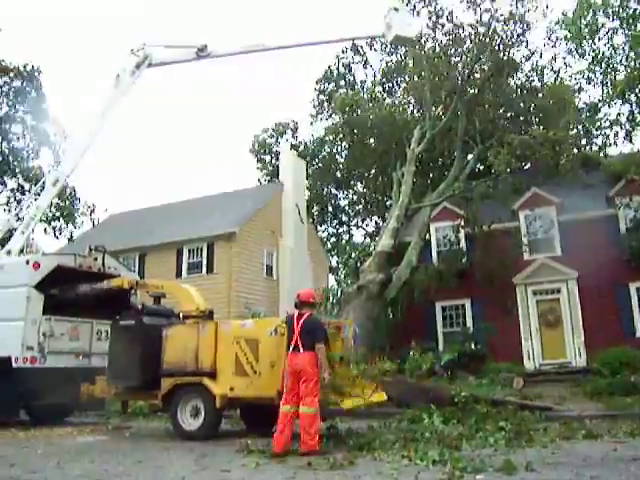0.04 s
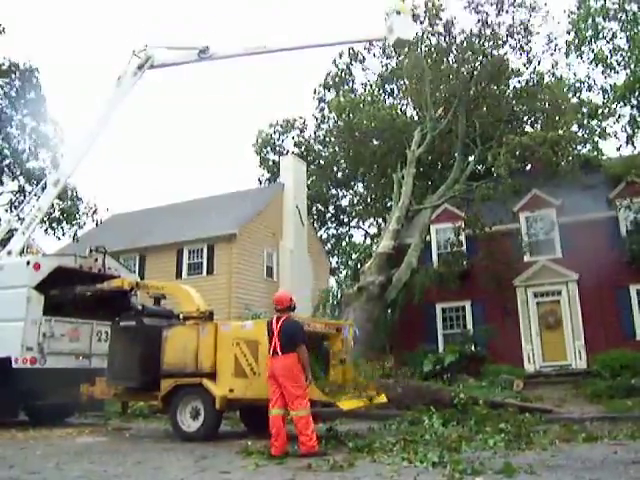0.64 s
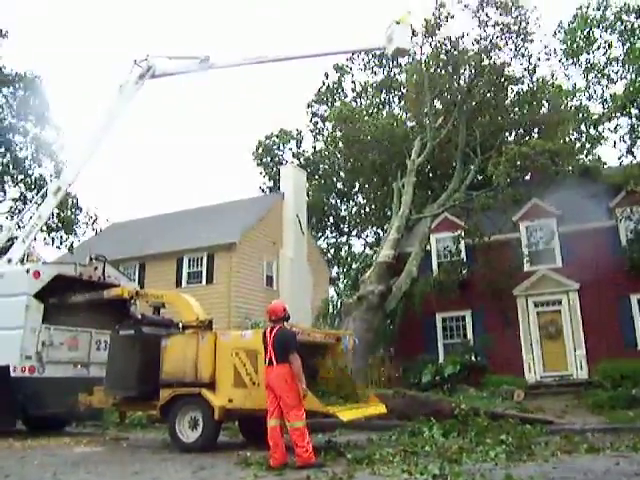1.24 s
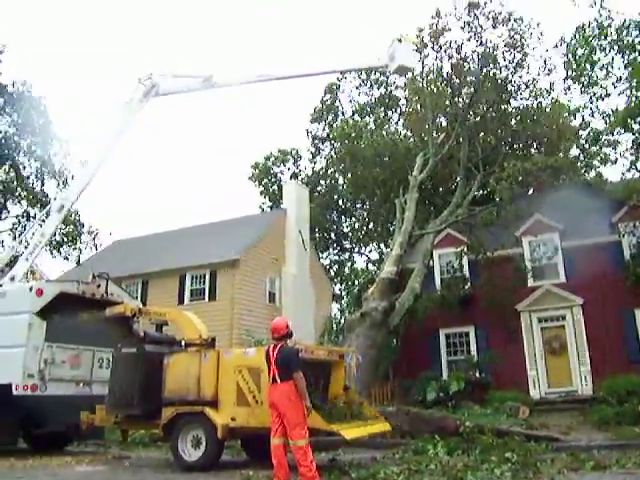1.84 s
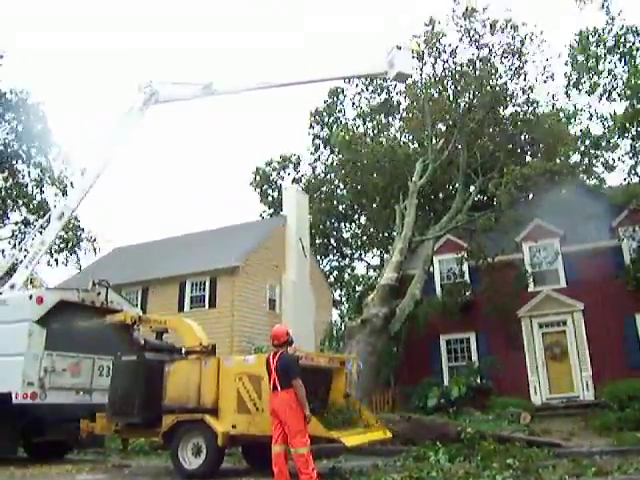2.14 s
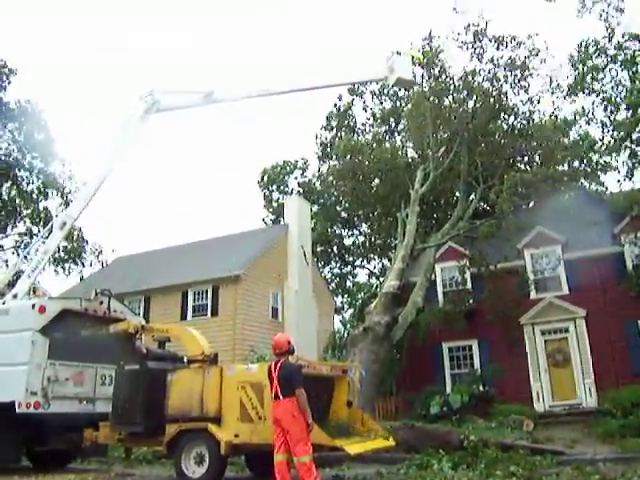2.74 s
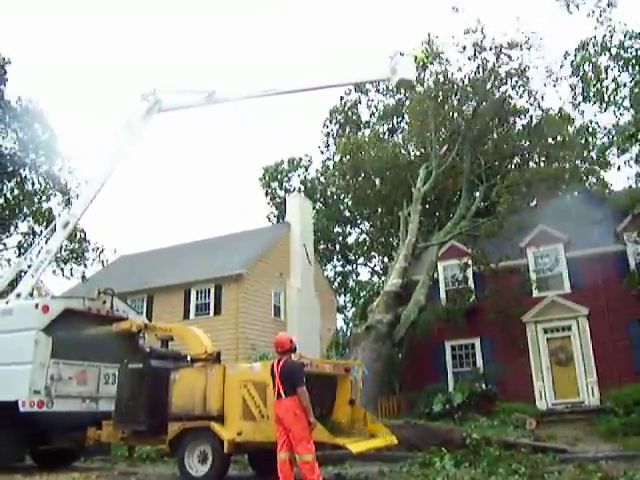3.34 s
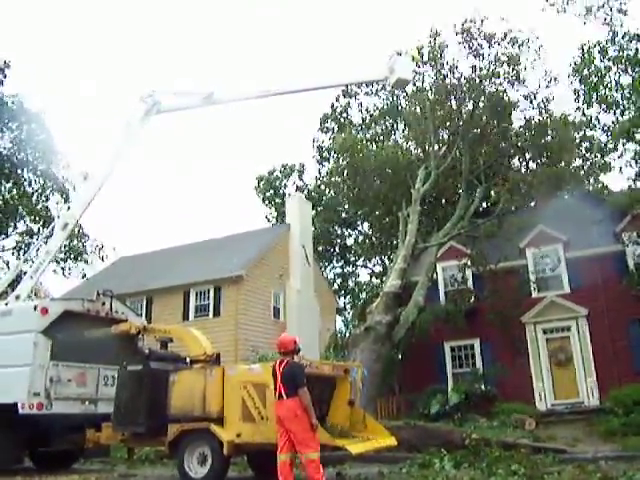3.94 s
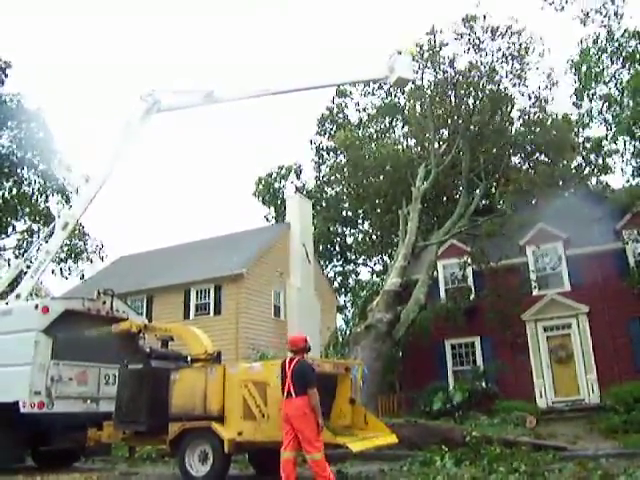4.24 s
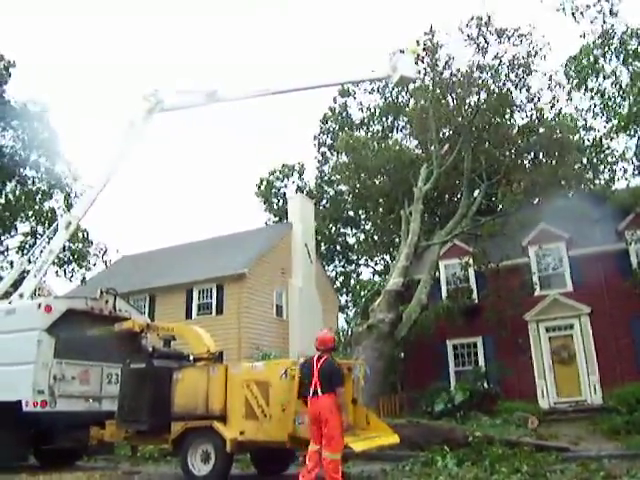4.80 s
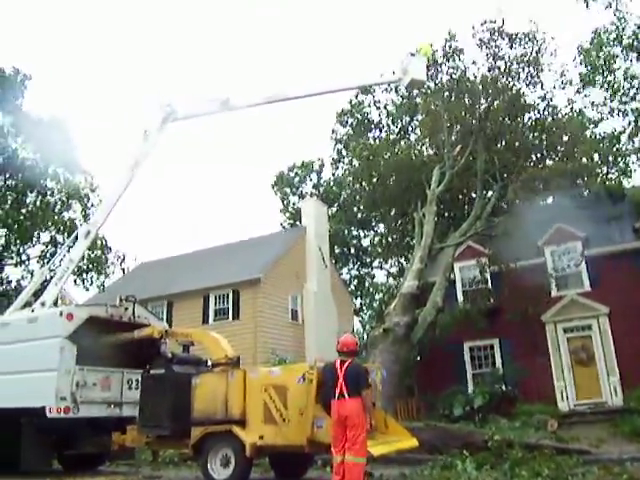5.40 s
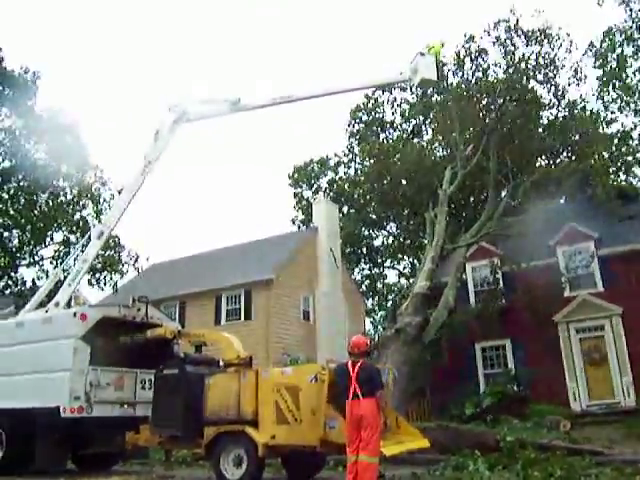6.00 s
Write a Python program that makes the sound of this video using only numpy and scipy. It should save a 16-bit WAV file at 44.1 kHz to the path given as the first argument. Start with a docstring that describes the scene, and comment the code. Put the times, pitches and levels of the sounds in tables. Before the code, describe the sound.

Branches rush and rattle through a wood chipper in repeated swells over its even, low engine drone, with a few faint knocks.

```python
"""A steady engine hum and a rush that swells with each branch: a wood chipper in a street, a truck behind.
At governed speed the exhaust beats evenly over a low rumble; the steel housing drones and rattles,
and air hisses from the chute. The housing howls in surges, and bits of wood clack faintly in it.
Now and then the whole sound dips suddenly and creeps back."""
import sys
import numpy as np
from scipy import signal
from scipy.fft import rfft, irfft, next_fast_len
from scipy.io import wavfile

SR = 44100
rng = np.random.default_rng(int(sys.argv[2]) if len(sys.argv) > 2 else 0)


def int16_out(signal):
    """Quantize to a 16-bit WAV file."""
    q = np.round(np.clip(np.atleast_2d(signal).T, -1, 1) * 32767)
    wavfile.write(sys.argv[1], SR, q.astype(np.int16))


N = 267246

TRUCK_CYCLE_HZ, FAN_BLADE_HZ = 21.24, 253.15
# truck engine harmonics: order, level_db
TRUCK_ORDERS = [(4, -36), (6, -41.5), (9, -35), (14, -44), (30, -50.5)]
# cooling fan harmonics: order, level_db
FAN_ORDERS = [(1, -28.5), (2, -46.5), (4, -45.5)]

# chipper crankshaft speed: time_s, speed_hz
CRANK_SPEED = [(0.3, 33.516), (0.8, 33.477), (1.3, 33.433), (1.8, 33.518), (2.3, 33.542), (2.8, 33.566),
               (3.3, 33.466), (3.8, 33.496), (4.3, 33.486), (4.8, 33.516), (5.3, 33.511), (5.8, 33.539)]
# slow, slight rise and fall in the exhaust's loudness: time_s, gain_db
EXHAUST_LEVEL = [(0, -0.4), (1.2, 0), (1.7, .3), (2.25, -0.9), (2.7, 0.8), (3.15, -0.2), (3.8, -0.7),
                 (4.4, 0.3), (5.1, -0.4), (6.06, -.4)]
# exhaust harmonics: crank_order, level_db
EXHAUST_ORDERS = [(1, -40.5), (2, -58), (3, -22.5), (4, -23), (5, -22), (6, -32), (7, -25), (8, -27.5),
                  (9, -39.5), (10, -55), (11, -42.5), (12, -45.5), (13, -46), (14, -52), (15, -48.5),
                  (16, -48.5), (17, -51), (19, -53.5), (20, -51.5), (22, -52)]
# exhaust gas spectrum: freq_hz, density_db
RUMBLE_SPECTRUM = [(4, -20.5), (15, -5.5), (58, -1.5), (95, 1), (150, 0), (195, 3.5), (255, -4.5),
                   (320, -8.5), (520, -13.5), (700, -23), (1500, -55.5)]

# housing drone spectrum: freq_hz, density_db
DRONE_SPECTRUM = [(300, -29), (570, -8), (660, -1.5), (780, -0.5), (900, -2.5), (970, -10.5), (1100, -12),
                  (1500, -22), (4000, -56)]
DRONE_IDLE_DB, PANEL_IDLE_DB = -31.5, -40
# housing howls: middle_s, length_s, drone_db, panel_db
HOWL_SURGES = [(.57, 0.23, -34, -37), (.87, 0.2, -29, -31.5), (2.14, 0.13, -31.5, -38),
               (3.23, 0.17, -30.5, -35), (3.497, 0.17, -25, -32), (3.86, 0.082, -34, -35),
               (4.46, .14, -34.5, -29), (5.442, 0.25, -29.5, -41)]
# modes of the struck housing: freq_hz, width_hz, level_db
HOUSING_MODES = [(784, 280, 0), (1350, 580, 6), (2220, 770, 12), (2700, 400, 6.5), (4700, 1800, 5),
                 (6730, 910, -2)]
# wood hitting the housing: start_s, level_db, t60_s, tilt_db_per_octave
WOOD_HITS = [(0.208, -18, 0.067, -5), (.298, -17, 0.092, -7), (.387, -12.5, 0.095, -8),
             (.833, -15, 0.13, -3), (1.072, -13, .09, 5), (1.548, -8, 0.054, 0), (1.65, -16.5, 0.15, 7),
             (2.089, -18, 0.061, -5), (2.13, -12.5, .1, -5), (2.163, -13.5, .1, 9), (2.39, -13, 0.14, -8),
             (2.85, -16, 0.21, -6), (3.478, -13, .08, 1), (3.492, -10, 0.18, 0), (4.04, -9.5, 0.13, 3),
             (4.478, -11.5, .15, 0), (5.565, -14, 0.14, 2), (5.984, -16, 0.17, 6.5)]

# housing rattle spectrum: freq_hz, density_db
RATTLE_SPECTRUM = [(400, -18.5), (900, -2.5), (1350, 1.5), (1750, -1.5), (2100, 1), (2300, 1), (2480, 2.5),
                   (2700, -1), (3100, -2.5), (3700, -8.5), (5000, -12.5), (8000, -43.5)]
# chute air spectrum: freq_hz, density_db
HISS_SPECTRUM = [(1500, -15), (3000, -1), (3900, -2), (4700, -0.5), (5500, -2), (6200, -3), (6800, -3),
                 (7500, -5.5), (8000, -15), (8450, -20.5), (9000, -40)]
RATTLE_IDLE_DB, HISS_IDLE_DB = -31, -35
# branches in the knives: start_s, length_s, rattle_db, hiss_db
BRANCH_FEEDS = [(0.139, .29, -31, -52), (.38, 0.65, -33, -39.5), (0.992, 0.68, -31.5, -34),
                (1.827, 0.4, -31, -34.5), (2.248, .26, -34, -39.5), (2.774, .26, -31.5, -34.5),
                (3.159, .37, -31, -32.5), (3.69, 0.58, -34, -36), (4.289, .24, -30.5, -34),
                (4.51, .29, -32.5, -36.5), (4.96, 0.4, -36.5, -39.5), (5.305, 0.35, -33.5, -34)]

# dips of the whole sound: start_s, depth_db
LEVEL_DIPS = [(.415, 3.8), (.972, 1.3), (1.731, 1.9), (1.955, 1.1), (2.175, 1.74), (2.91, 0.8), (3.38, 2.5),
              (3.505, 2.5), (4.06, 1), (4.49, 1.4), (4.791, 2), (5.53, 1.5), (5.78, 1)]


def amp(db):
    """Decibels to gain."""
    return 10 ** (np.asarray(db) / 20)


def unit(x):
    """Scale to rms 1."""
    return x / np.sqrt(np.mean(x ** 2) + 1e-20)


def curve(rows):
    """Time table, interpolated per sample."""
    return np.interp(np.arange(N) / SR, *np.transpose(rows))


def gain_at(spectrum, hz):
    """Spectrum gain at hz."""
    freq_hz, db = np.transpose(spectrum)
    return amp(np.interp(np.log(hz + 1), np.log(freq_hz + 1), db))


def colour(x, spectrum):
    """Filter by a spectrum, rms 1."""
    size = next_fast_len(N)
    gain = gain_at(spectrum, np.fft.rfftfreq(size, 1 / SR))
    return unit(irfft(rfft(x, size) * gain, size)[:N])


def wander(hz):
    """Random drift up to about hz, rms 1."""
    frames = N // 64 + 2
    freq_hz = np.fft.rfftfreq(frames, 64 / SR)
    white = rfft(rng.standard_normal(frames))
    slow = irfft(white * (freq_hz > 0) / (1 + (freq_hz / hz) ** 2), frames)
    return unit(np.interp(np.arange(N), np.linspace(0, N, frames), slow))


def beats(turns, depth):
    """Gain pulsing once a turn, with a weaker second harmonic."""
    return np.exp(depth * (np.cos(2 * np.pi * turns) + 0.21 * np.cos(4 * np.pi * turns)))


def rotor(hz, orders, drift, waver_db):
    """Harmonics of a machine turning at its own drifting speed."""
    turns = np.cumsum(hz * (1 + drift * wander(2.1))) / SR
    hum = 0
    for order, db in orders:
        gain = amp(db + waver_db * wander(2.3))
        hum += gain * np.cos(2 * np.pi * (order * turns + rng.random()))
    return np.sqrt(2) * hum


def exhaust_rumble(turns, load, level_db=-26, depth=0.049, load_exponent=0.56):
    """Turbulent gas, puffing with the beats and growing with load."""
    puffs = rng.standard_normal(N) * beats(turns, depth)
    return amp(level_db) * unit(load) ** load_exponent * colour(puffs, RUMBLE_SPECTRUM)


def exhaust_hum(turns, waver_db=0.86, skew_rad=1.58, smear_rad=0.0512):
    """Two unlike beats a turn: even orders are skewed against odd; the pipe smears each beat."""
    hum = 0
    for order, db in EXHAUST_ORDERS:
        shift_rad = (order + 1) % 2 * skew_rad + smear_rad * order ** 2
        hum += amp(db + waver_db * wander(3)) * np.cos(2 * np.pi * order * turns + shift_rad)
    return np.sqrt(2) * hum


def wood_clacks(level_db=-7.5, rise_s=0.0047, pivot_hz=2200):
    """Short scrapes ring the broad housing modes; each hit has its own tilt, duller or brighter."""
    t, out = np.arange(SR // 4) / SR, np.zeros(N + SR)
    for start_s, hit_db, t60_s, tilt_db in WOOD_HITS:
        ring = 0
        for hz, width_hz, db in HOUSING_MODES:
            mode = signal.iirpeak(hz, hz / width_hz, SR)
            scrape = signal.lfilter(*mode, signal.lfilter(*mode, rng.standard_normal(len(t))))
            ring += amp(db + tilt_db * np.log2(hz / pivot_hz)) * unit(scrape)
        envelope = amp(hit_db - 60 * t / t60_s) * (1 - np.exp(-t / rise_s))
        out[round(start_s * SR):][:len(t)] += envelope * unit(ring)
    return amp(level_db) * out[:N]


def howl_gains():
    """Drone and panel gains: bell-shaped surges over idle."""
    t, power = np.arange(N) / SR, amp([[DRONE_IDLE_DB], [PANEL_IDLE_DB]]) ** 2
    for middle_s, length_s, drone_db, panel_db in HOWL_SURGES:
        swell = np.exp(-2 * ((t - middle_s) / length_s) ** 2)
        power = power + (amp([[drone_db], [panel_db]]) * swell) ** 2
    return np.sqrt(power)


def housing_drone(turns, drone_gain, panel_gain, lines_db=-6, noise_db=-2.0, panel_hz=770,
                  slip_turns=0.15, panel_slip_turns=0.1):
    """Steel shaken by high engine orders and noise; one panel sings on its nearest order."""
    crank_hz = CRANK_SPEED[0][1]
    panel_order = round(panel_hz / crank_hz)
    lines = 0
    for order in np.setdiff1d(np.arange(19, 32), panel_order):
        cycles = order * turns + rng.random() + slip_turns * wander(3.4)
        lines += gain_at(DRONE_SPECTRUM, order * crank_hz) * np.cos(2 * np.pi * cycles)
    noise = colour(rng.standard_normal(N) * beats(turns, depth=0.1), DRONE_SPECTRUM)
    panel = np.cos(2 * np.pi * (panel_order * turns + panel_slip_turns * wander(5.1)))
    body = amp(lines_db) * unit(lines) + amp(noise_db) * noise
    return drone_gain * body + panel_gain * unit(panel)


def feed_gains(bite_s=0.036, clear_s=0.048):
    """Rattle and hiss gains over idle: the knives bite each branch, hold, then the chute empties."""
    t, power = np.arange(N) / SR, amp([[RATTLE_IDLE_DB], [HISS_IDLE_DB]]) ** 2
    for start_s, length_s, rattle_db, hiss_db in BRANCH_FEEDS:
        attack = np.clip((t - start_s) / bite_s, 0, 1)
        release = np.exp(-np.maximum(t - start_s - length_s, 0) / clear_s)
        power = power + (amp([[rattle_db], [hiss_db]]) * attack * release) ** 2
    return np.sqrt(power)


def chip_rush(spectrum, turns, depth, flutter_db, ticks_db, ticks_per_s, spread_db,
              flutter_hz=35, tick_s=0.00069):
    """Rushing air with dense ticks of chips and metal."""
    sizes = amp(spread_db * np.minimum(rng.exponential(1, N), 4))
    impacts = sizes * (rng.random(N) < ticks_per_s / SR)
    tick_power = signal.lfilter([1], [1, -np.exp(-1 / (tick_s * SR))], impacts ** 2)
    air = rng.standard_normal(N)
    ticks = amp(ticks_db) * unit(np.sqrt(tick_power) * rng.standard_normal(N))
    flutter = amp(flutter_db * wander(flutter_hz))
    return colour((air + ticks) * beats(turns, depth) * flutter, spectrum)


def scene():
    """Truck and fan run free; the crankshaft times exhaust, drone and rush."""
    turns = np.cumsum(curve(CRANK_SPEED) * (1 + 0.0014 * wander(13))) / SR
    drone_gain, panel_gain = howl_gains()
    rattle_gain, hiss_gain = feed_gains()
    truck = rotor(TRUCK_CYCLE_HZ, TRUCK_ORDERS, drift=0.00051, waver_db=3.5)
    fan = rotor(FAN_BLADE_HZ, FAN_ORDERS, drift=0.001, waver_db=1.7)
    exhaust_gain = amp(curve(EXHAUST_LEVEL))
    exhaust = exhaust_gain * (exhaust_hum(turns) + exhaust_rumble(turns, load=rattle_gain * drone_gain))
    rattle = rattle_gain * chip_rush(RATTLE_SPECTRUM, turns, depth=0.06, flutter_db=0.43,
                                     ticks_db=-9.0, ticks_per_s=500, spread_db=3.5)
    hiss = hiss_gain * chip_rush(HISS_SPECTRUM, turns, depth=0.034, flutter_db=0.9,
                                 ticks_db=-7, ticks_per_s=740, spread_db=4.0)
    drone = housing_drone(turns, drone_gain, panel_gain)
    return (truck + fan + exhaust + wood_clacks() + drone + rattle + hiss)[None]


def record(dry, fall_s=0.01, recover_s=0.4, undipped_db=1.42, cutoff_hz=8950):
    """Sudden level dips with slow recovery, then a low-pass."""
    t, dip_db = np.arange(N) / SR, 0
    for start_s, depth_db in LEVEL_DIPS:
        since_s = np.maximum(t - start_s, 0)
        dip_db += depth_db * np.minimum(since_s / fall_s, 1) * np.exp(-since_s / recover_s)
    lowpass = signal.firwin(401, cutoff_hz, window=("kaiser", 9), fs=SR)
    return signal.oaconvolve(dry * amp(undipped_db - dip_db), lowpass[None], "same")


dry = scene()
out = record(dry)
int16_out(out)
```